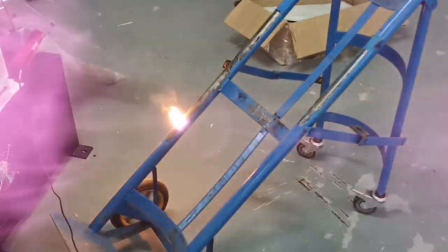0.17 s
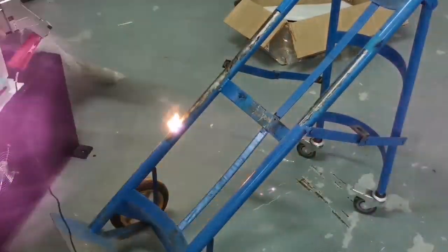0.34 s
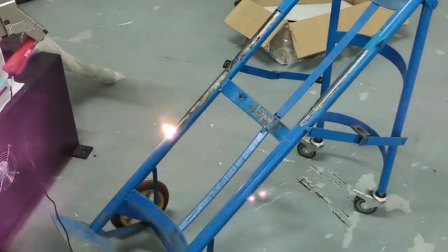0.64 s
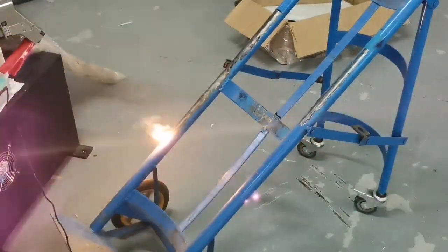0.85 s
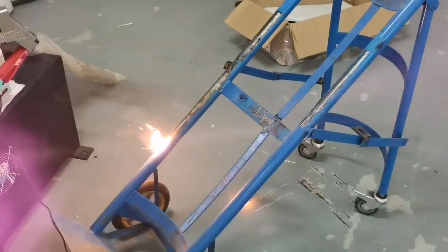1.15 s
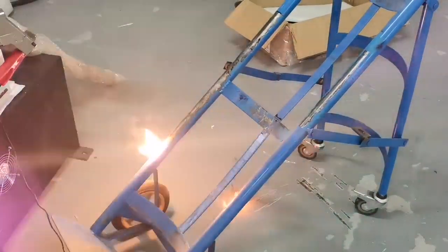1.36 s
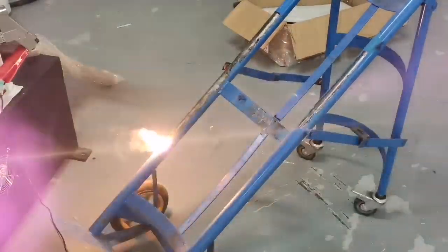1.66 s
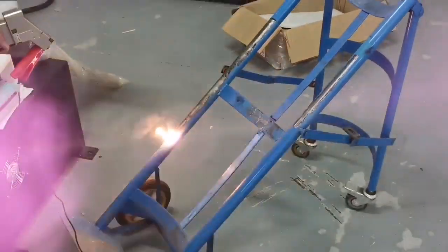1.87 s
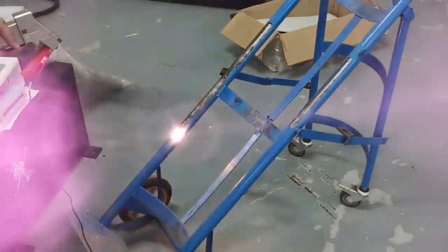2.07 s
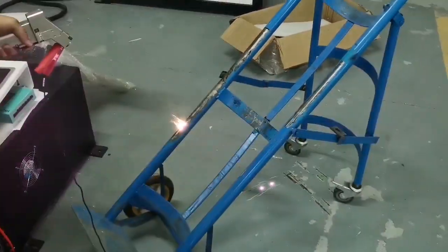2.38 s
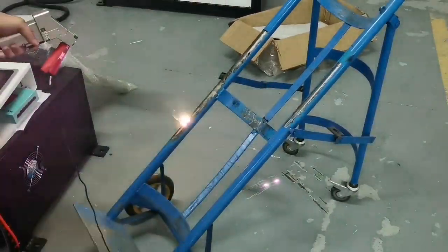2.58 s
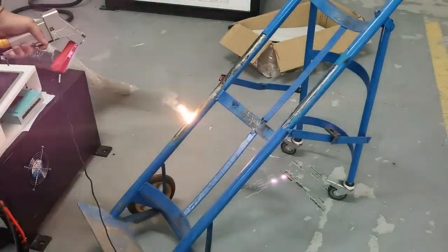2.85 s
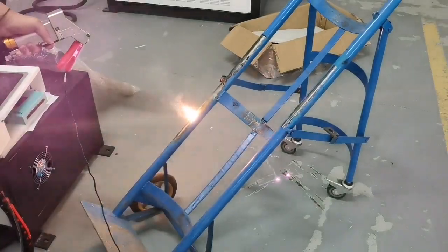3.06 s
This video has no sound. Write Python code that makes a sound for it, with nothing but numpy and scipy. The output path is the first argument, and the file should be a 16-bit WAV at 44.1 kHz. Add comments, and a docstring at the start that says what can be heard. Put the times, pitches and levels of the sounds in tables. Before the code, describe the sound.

A hand-held laser cleaner hisses brightly throughout while stripping paint from a steel cart, its beam buzzing unevenly. A low flame rumble fades at the start; a faint fan hums. Close stereo phone in a workshop.

```python
"""A hand-held laser burns paint off a steel tube in a workshop. At the start a low flame noise dies away.
All through, a steady air hiss (coloured noise) dominates, a fan hums (one wavering tone), and the sweeping
beam buzzes (overtones of its sweep rate, rising and falling). About halfway the phone turns a little,
so the hiss changes colour at its two microphone ports."""
import sys
import numpy as np
from scipy import signal
from scipy.io import wavfile
from scipy.ndimage import uniform_filter1d

SR = 44100
rng = np.random.default_rng(int(sys.argv[2]) if len(sys.argv) > 2 else 0)


def persist_wave(psi):
    """Save psi, clipped to +-1, as 16-bit WAV."""
    counts = np.round(np.clip(psi, -1, 1) * 32767).astype(np.int16)
    wavfile.write(sys.argv[1], SR, np.atleast_2d(counts).T)


N = 142002  # length in samples

# Hiss and workshop air noise before and after the phone turns, ahead of echoes and small changes:
# pitch_hz, left_before_db_per_hz, right_before_db_per_hz, left_after_db_per_hz, right_after_db_per_hz
HISS_COLOUR = [(30, -85.5, -86.5, -87, -87), (110, -83.0, -85.0, -87.3, -86.7),
               (220, -75.8, -77.5, -77, -78.6), (350, -77.6, -78.6, -78.6, -79.8),
               (600, -83, -83.6, -87, -86.8), (1000, -79.5, -80.8, -82.4, -82.4),
               (1500, -82, -83.2, -84.5, -84.3), (2150, -77.5, -76.5, -79, -77.5),
               (2700, -71.4, -63.7, -72.2, -65.2), (3300, -66.8, -55.2, -67.1, -57.3),
               (3800, -58.9, -51.4, -61.8, -50.5), (4400, -56.3, -48.2, -58.3, -49.2),
               (4900, -60.2, -49.6, -60.8, -50.7), (5300, -65.3, -59.5, -68.0, -56.2),
               (5900, -66.5, -63.6, -70.6, -58.4), (6700, -65.9, -67.8, -70.6, -61.1),
               (7200, -67.5, -76.2, -72.3, -71.3), (7800, -65.1, -82.9, -69.5, -80.9),
               (8400, -63.6, -82.0, -66.8, -83.6), (9000, -58.9, -79.1, -62.3, -77.8),
               (9500, -64.1, -79.9, -66.1, -78.2), (9900, -74.1, -76.6, -74.6, -76.9),
               (11200, -78.6, -73.6, -80.5, -73.2), (13400, -82.4, -77.0, -84.8, -78.6),
               (14400, -88.2, -86.1, -91.0, -84.7), (15500, -93.9, -95.3, -89.1, -88.9)]
# How the phone turns and the hiss changes: time_s, turned_0_to_1, level_db, extra_left_treble_db
PHONE_TURN = [(0, 0, 0, -2.5), (.55, 0.02, 0, 0.5), (.85, 0, -0.7, 1), (1.2, 0, 0.26, -1.5),
              (1.45, 0.7, -.3, 2), (1.55, .7, -0.24, -3), (2.0, 0.76, 0.2, -1.5), (2.902, 0.9, 0, 2),
              (3.22, 0.63, -0.3, 0.5)]
# How the hiss compares at the two ports: pitch_hz, likeness_0_to_1, left_lead_radians
PORT_PAIR = [(150, .9, .05), (800, .4, .2), (1500, .1, .6), (2700, .5, 1.1), (3000, .3, -.8),
             (3450, .75, -2.6), (4200, .8, -2.9), (5000, .75, -.4), (6500, .7, 3.6), (8000, .45, 6.5),
             (9700, .55, 8.5), (12000, .4, 14.)]
# Echoes from nearby surfaces: delay_ms, level_db
NEAR_ECHOES = [(1.9, -14), (3.0, -16), (4.8, -20)]
# Narrow ridges in the hiss at the right port: start_s, end_s, pitch_hz, boost_db
HISS_RIDGES = [(0, .95, 4970, 5), (.05, .85, 4350, 4.5), (.95, 1.9, 3550, 4.5), (.65, 1.75, 4500, 5),
               (1.3, 1.85, 4210, 4), (2.0, 3.22, 5950, 4)]
# Beam buzz, one level curve each for overtones 2, 3, 4, 6 and 1 of the sweep rate: time_s, level_db
BUZZ_CURVES = [
    [(0, -53.5), (.15, -56), (.45, -60), (.88, -69.5), (1.3, -55.5), (1.88, -64.5), (2.2, -70), (2.4, -60),
     (2.6, -70), (3.22, -67.5)],
    [(0, -53.5), (.4, -60.5), (.55, -69), (.89, -74), (.93, -51), (1.3, -63.5), (1.56, -56), (1.8, -53.5),
     (2.3, -63.5), (2.72, -64), (2.75, -51.5), (2.84, -58), (3.22, -58)],
    [(.03, -55.5), (.12, -46), (.22, -58), (.42, -53), (.55, -58.5), (1.08, -63), (1.28, -54.5),
     (1.47, -60.5), (1.57, -53.5), (1.86, -62), (1.9, -64), (2.05, -56), (2.33, -54.5), (2.5, -61),
     (2.72, -55.5), (2.75, -43.5), (2.83, -58), (2.89, -46.5), (2.95, -59), (3.08, -48), (3.22, -51)],
    [(0, -46), (.12, -72), (.4, -56.5), (.54, -46), (.89, -53), (.93, -47), (1.02, -54.5), (1.29, -46),
     (1.46, -60), (1.56, -45.5), (1.9, -51), (2.0, -55.5), (2.3, -49.5), (2.43, -57.5), (2.5, -46),
     (3.1, -57), (3.22, -42)],
    [(.9, -66), (1.0, -53), (1.15, -76), (1.45, -56.5), (1.8, -58.5), (2.3, -66), (2.7, -65), (2.78, -54),
     (3.0, -64), (3.2, -57)],
]
# Overtones of the beam sweep: multiple_of_sweep_rate, buzz_curve_index, left_minus_right_db, left_lead_radians
BEAM_OVERTONES = [(1, 4, 3, .1), (2, 0, 7, .2), (3, 1, -1, .9), (4, 2, 2, .4), (5, 4, .5, .6),
                  (6, 3, -7, .5), (7, 3, -10, 1.1), (8, 3, -12, -.8)]
# Level of each beam overtone above the curve it follows: level_db
OVERTONE_BOOST = [-0.82, 3.8, 1.9, 3.3, -0.077, 4.2, 3, 3]
# Colour of the flame noise, ahead of its loudness curve: pitch_hz, level_db_per_hz
FLAME_COLOUR = [(60, -3), (200, 1.5), (400, -1.5), (700, -9.5), (1100, -2), (1500, -24)]
# Loudness of the flame: time_s, level_db
FLAME_FADE = [(0, -46), (.03, -39.5), (.15, -43), (.18, -48), (.45, -56), (.7, -72)]

PATCH_DB, FLICKER_DB = 0.5, 0.45  # typical size of the hiss's patches and level flicker
TREBLE_HZ, TREBLE_WIDTH_HZ, RIDGE_WIDTH_HZ = 8860, 1200, 56
PHASE_SCATTER, SCATTER_FROM_HZ = 1.0, 3000  # radians, reached in full from this pitch up
ECHO_WANDER_MS = .06
RIPPLE_DB = 2.8  # typical size of the workshop's peaks and dips
SWEEP_HZ, SWEEP_WANDER = 398.3, .0015  # wander as a share of the rate
SPUTTER_DB, SPUTTER_HZ = 2.6, 110  # typical size and fastest rate
FAN_HZ, FAN_DB, FAN_WANDER, FAN_WAVER_DB = 147.4, -55, 0.013, 2.6  # wander as a share of the pitch
LOW_CUT_HZ, EDGE_HZ = 30, 15740


def gain_of(db):
    """Turns decibels into a gain to multiply by."""
    return 10 ** (np.asarray(db) / 20)


def evened(x):
    """Scales to an average strength (rms) of 1."""
    return x / np.sqrt(np.mean(x ** 2) + 1e-20)


def read(table, column, hz):
    """Reads one table column at any pitch, joining its points on a logarithmic pitch scale."""
    rows = np.array(table)
    return np.interp(np.log(hz + 1), np.log(rows[:, 0] + 1), rows[:, column])


def drift(t, top_hz):
    """A random wander of rms 1: 24 sine waves up to top_hz, the slower ones larger."""
    total = 0
    for f in top_hz * np.geomspace(1 / 20, 1, num=24):
        total = total + np.sin(2 * np.pi * (f * t + rng.random())) / np.sqrt(f)
    return evened(total)


def patchy(shape, pitch_steps, time_steps):
    """Random patches of rms 1, made by smoothing noise along pitch, then along time."""
    along_pitch = uniform_filter1d(rng.standard_normal(shape), size=pitch_steps, axis=-2)
    return evened(uniform_filter1d(along_pitch, size=time_steps, axis=-1))


def bump(hz, center_hz, width_hz):
    """A smooth hill in pitch, 1 at its top."""
    return np.exp(-((hz - center_hz) / width_hz) ** 2)


def spectra(x):
    """Splits sound into short moments: pitches, times and the spectrum at each time."""
    return signal.stft(x, SR, nperseg=1024, noverlap=768)


def sound(z):
    """Joins short-time spectra back into sound."""
    return signal.istft(z, SR, nperseg=1024, noverlap=768)[1][..., :N]


def port_noise(hz, a, b):
    """Mixes two noises so the ports are partly alike; reflections scatter the phase between them."""
    same = np.clip(read(PORT_PAIR, 1, hz), 0, 1)[:, None]
    scatter_size = PHASE_SCATTER * np.minimum(hz / SCATTER_FROM_HZ, 1)[:, None] ** 2
    lead = read(PORT_PAIR, 2, hz)[:, None] + scatter_size * patchy(a.shape, 3, 60)
    left = same * a * np.exp(1j * lead) + np.sqrt(1 - same ** 2) * b
    return np.array([left, a])


def near_echoes(hz, t):
    """Nearby surfaces add delayed copies; their wandering delays strengthen and weaken parts of the hiss."""
    ports = []
    for _ in range(2):
        response = 1
        for delay_ms, db in NEAR_ECHOES:
            wandering_ms = delay_ms + ECHO_WANDER_MS * drift(t, 1.)
            response = response + gain_of(db) * np.exp(-2j * np.pi * np.outer(hz, wandering_ms) / 1000)
        ports.append(response)
    return np.array(ports)


def hiss():
    """Turbulent air: noise with faint patches, near echoes and a colour that moves as the phone turns."""
    hz, t, (a, b) = spectra(rng.standard_normal((2, N)))
    z = port_noise(hz, a, b)
    s, turned, level_db, treble_db = np.transpose(PHONE_TURN)
    turn = np.interp(t, s, turned)
    colour_db = np.array([np.outer(read(HISS_COLOUR, 1 + port, hz), 1 - turn)
                          + np.outer(read(HISS_COLOUR, 3 + port, hz), turn) for port in (0, 1)])
    change_db = PATCH_DB * patchy(z.shape, 14, 16)
    change_db += FLICKER_DB * drift(t, 20.) + np.interp(t, s, level_db)
    change_db[0] += np.outer(bump(hz, TREBLE_HZ, TREBLE_WIDTH_HZ), np.interp(t, s, treble_db))
    for start, end, ridge_hz, ridge_db in HISS_RIDGES:
        # each ridge fades in and out over 0.1 s
        fade = np.clip(10 * np.minimum(t - start, end - t) + .5, 0, 1)
        change_db[1] += ridge_db * np.outer(bump(hz, ridge_hz, RIDGE_WIDTH_HZ), fade)
    z *= near_echoes(hz, t)
    # sqrt(SR / 2) makes the colour table's levels count per Hz
    return sound(z * gain_of(colour_db + change_db) * np.sqrt(SR / 2))


def workshop(x):
    """Distant walls comb the sound into fine peaks and dips that shift slowly, about keeping its power."""
    z = signal.stft(x, nperseg=4096, noverlap=3072)[2]
    gain = gain_of(RIPPLE_DB * patchy(z.shape, 2, 24))
    return signal.istft(z * evened(gain), nperseg=4096, noverlap=3072)[1][:, :N]


def buzz():
    """The beam crosses the tube at the sweep rate; each overtone sputters as the paint burns unevenly."""
    t, out = np.arange(N) / SR, np.zeros((2, N))
    sweep_hz = SWEEP_HZ * (1 + SWEEP_WANDER * drift(t, 12.))
    phase = 2 * np.pi * np.cumsum(sweep_hz) / SR
    for (multiple, curve, pan_db, lead), boost_db in zip(BEAM_OVERTONES, OVERTONE_BOOST):
        db = np.interp(t, *np.transpose(BUZZ_CURVES[curve])) + boost_db
        db += SPUTTER_DB * drift(t, SPUTTER_HZ)
        sides = gain_of(np.array([[pan_db], [-pan_db]]) / 2)
        start_phase = 2 * np.pi * rng.random() + np.array([[lead], [0]])
        tone = np.sqrt(2) * np.sin(multiple * phase + start_phase)  # rms 1
        out += gain_of(db) * sides / sides.mean() * tone
    return out


def flame():
    """Burning fumes make a low noise, nearly alike in both ports, that follows a fading loudness curve."""
    common, left, right = rng.standard_normal((3, N))
    hz, _, z = spectra(np.array([common + 0.42 * left, common + .35 * right]))
    low_noise = evened(sound(z * gain_of(read(FLAME_COLOUR, 1, hz))[:, None]))
    s, db = np.transpose(FLAME_FADE)
    return low_noise * gain_of(np.interp(np.arange(N) / SR, s, db))


def fan():
    """The fan's blades make one tone, wavering in pitch and level, the same in both ports."""
    t = np.arange(N) / SR
    pitch_hz = FAN_HZ * (1 + FAN_WANDER * drift(t, 6.0))
    phase = 2 * np.pi * np.cumsum(pitch_hz) / SR
    level_db = FAN_DB + FAN_WAVER_DB * drift(t, 29.63)
    return np.sqrt(2) * gain_of(level_db) * np.sin(phase)


def scene():
    """Adds all sources at the two ports; only the hiss gets the workshop's ripple."""
    return workshop(hiss()) + buzz() + flame() + fan()


def record(dry):
    """The microphone rolls off the deepest bass, and a steep filter removes the highest treble."""
    thin = signal.lfilter(*signal.butter(1, LOW_CUT_HZ, "high", fs=SR), dry)
    treble_cut = signal.firwin(1023, EDGE_HZ, window=("kaiser", 9), fs=SR)
    return signal.oaconvolve(thin, treble_cut[None], "same")


dry = scene()
out = record(dry)
persist_wave(out)
```